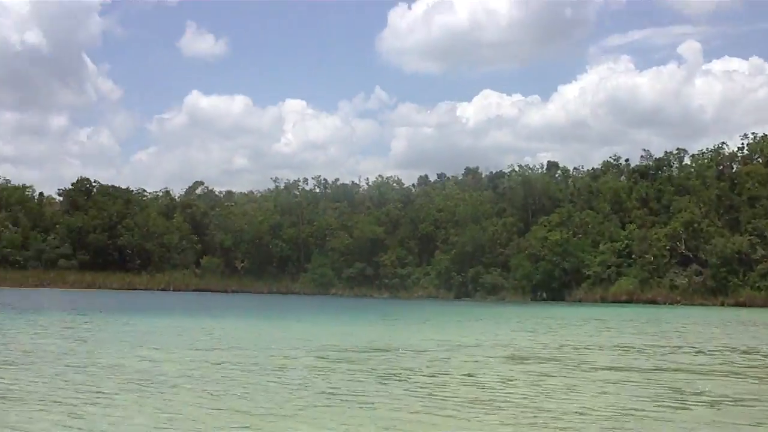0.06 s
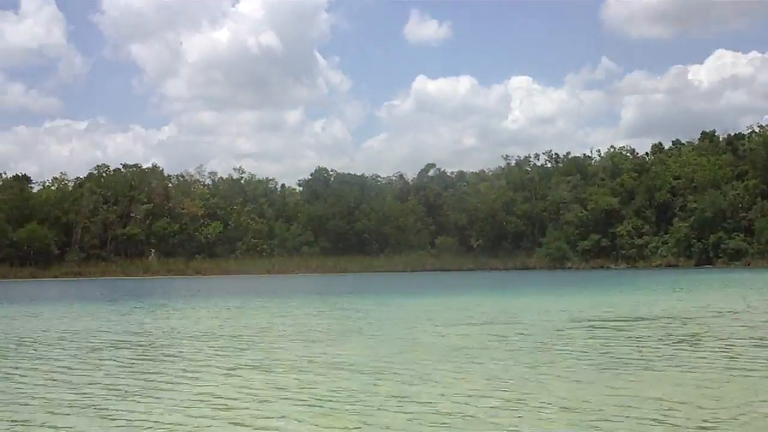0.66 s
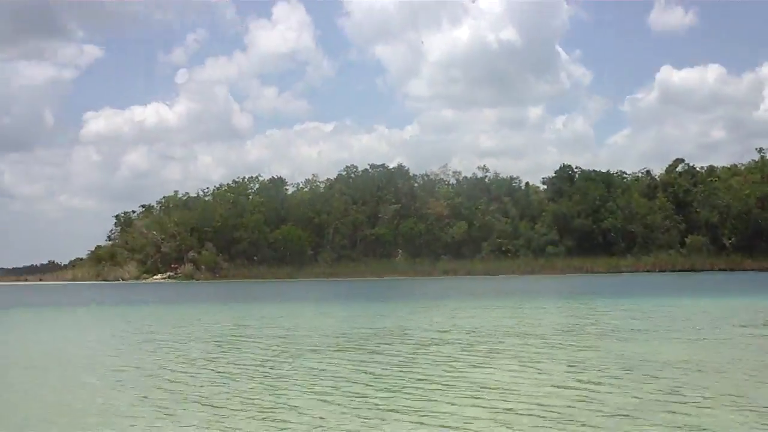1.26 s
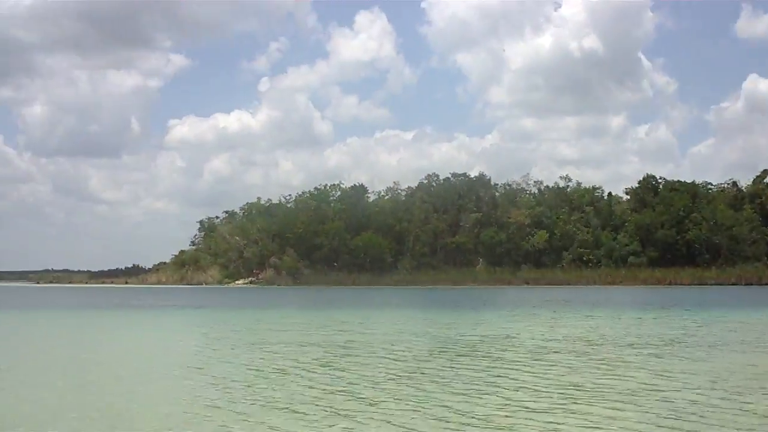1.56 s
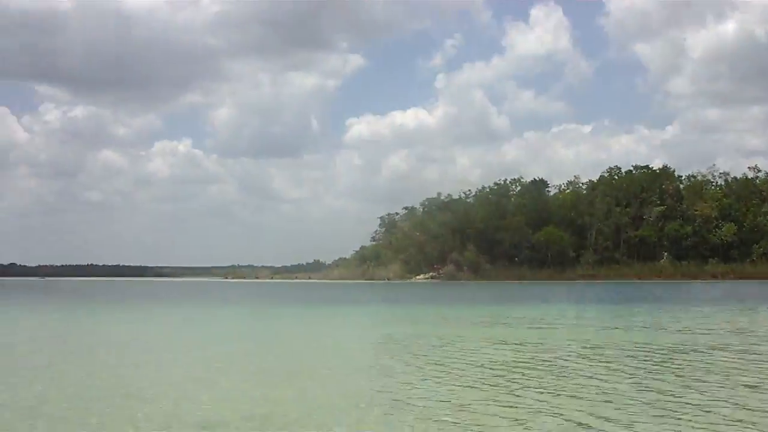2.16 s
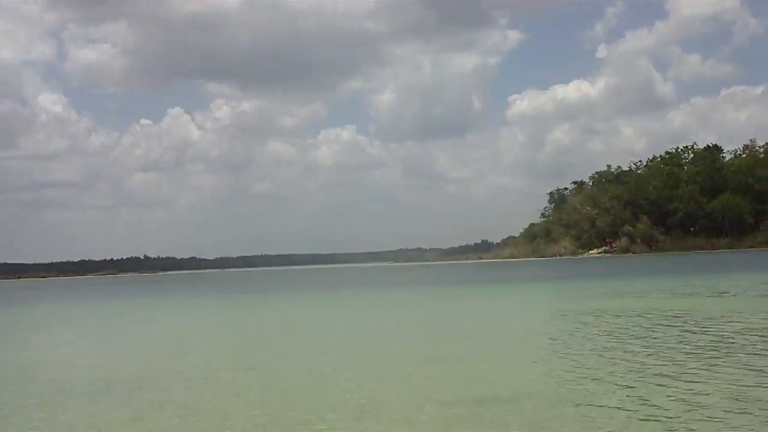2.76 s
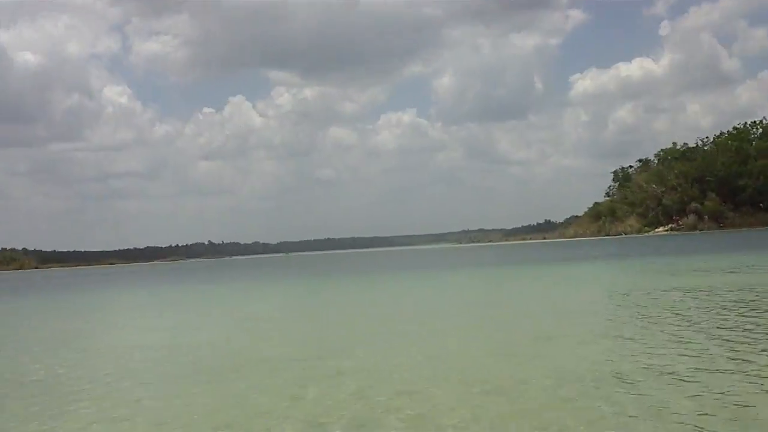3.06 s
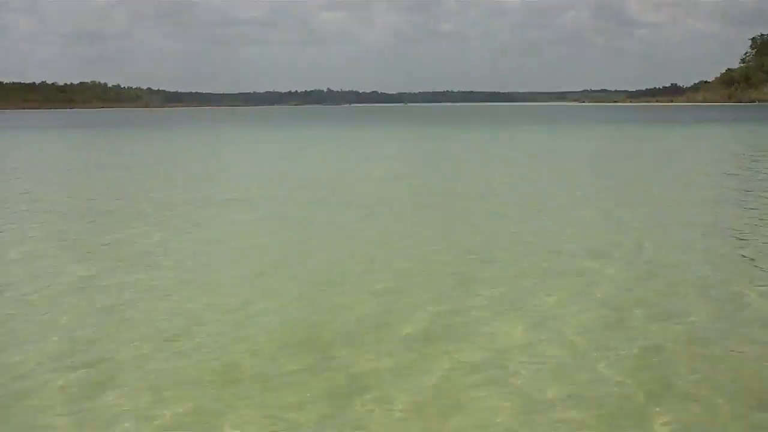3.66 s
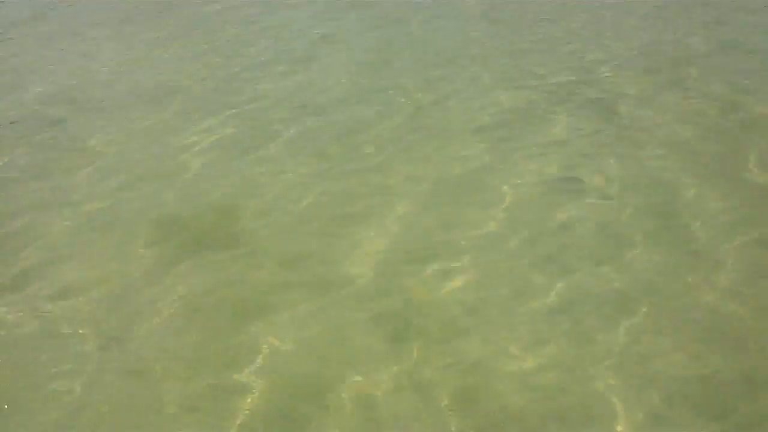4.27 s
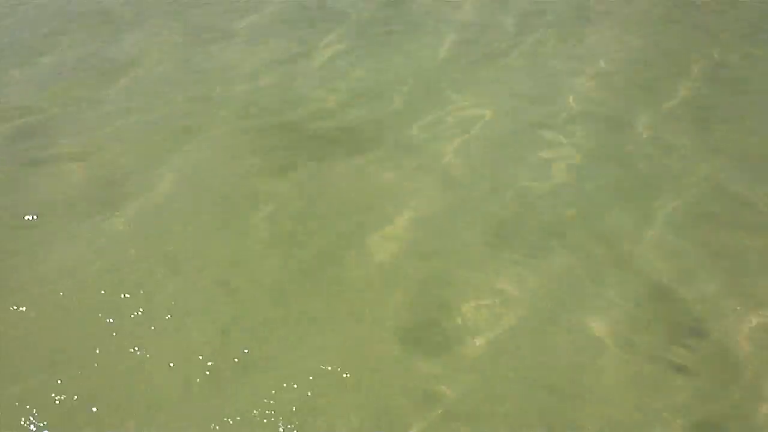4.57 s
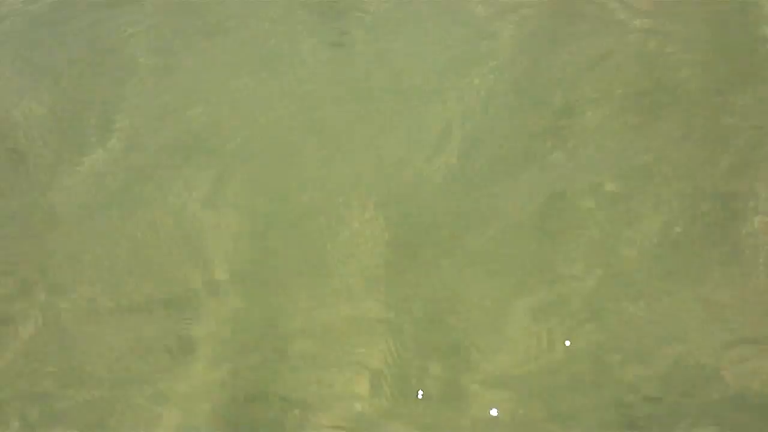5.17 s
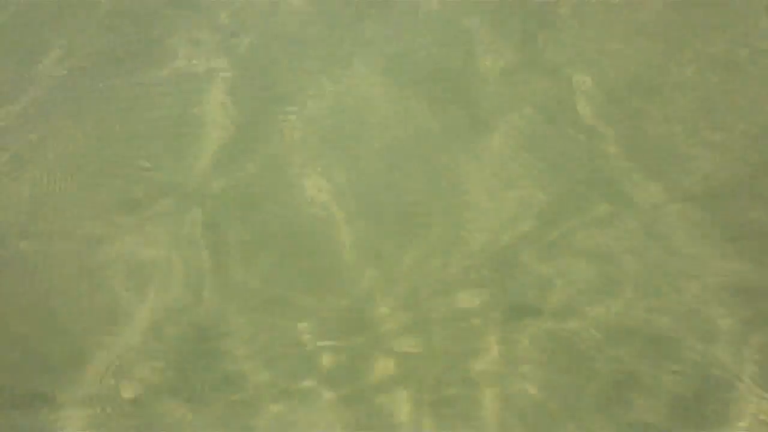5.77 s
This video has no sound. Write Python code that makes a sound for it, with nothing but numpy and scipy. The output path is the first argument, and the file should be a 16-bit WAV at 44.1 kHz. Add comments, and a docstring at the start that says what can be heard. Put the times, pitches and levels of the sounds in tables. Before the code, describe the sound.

Lake water laps, gurgles and slaps against a small boat, with a few sharp knocks and wind buffeting the microphone.

```python
"""Lake water around a small boat

Out on a lake in a little paddled boat, microphone close to the water. Each small wave builds, breaks
and drains, folding under air that rings as bubbles; some slap the hull or boom in the hollow below it.
Drops tick, foam fizzes and a few sharp knocks sound close by. Wind buffets the microphone over a
faint open-air hiss."""
import sys
import numpy as np
from scipy import signal
from scipy.fft import rfft, irfft, next_fast_len
from scipy.io import wavfile
from scipy.ndimage import uniform_filter1d

SR = 44100
rng = np.random.default_rng(int(sys.argv[2]) if len(sys.argv) > 2 else 0)


def persist_wave(psi):
    """Save psi, clipped to +-1, as 16-bit WAV."""
    counts = np.round(np.clip(psi, -1, 1) * 32767).astype(np.int16)
    wavfile.write(sys.argv[1], SR, np.atleast_2d(counts).T)


N = 261513
TIME = np.arange(N) / SR
# The ripple that never stops between waves.
RIPPLE_LAP_DB, RIPPLE_GURGLE_DB, RIPPLE_TRICKLE_DB, RIPPLE_SPRAY_DB = -45.5, -48, -58.5, -59


def gain_of(db):
    """Decibels to amplitude."""
    return 10 ** (np.asarray(db) / 20)


def unit_rms(x):
    """Scales x to rms 1."""
    return x / np.sqrt(np.mean(x ** 2) + 1e-20)


def decay(t, t60):
    """An exponential fade, 60 dB down at t60."""
    return np.exp(-np.log(1000) * t / t60)


def coloured(x, colour):
    """Filters x and scales it to rms 1. Each row of colour: frequency in Hz, relative gain in dB."""
    hz, db = np.transpose(colour)
    size = 2 * next_fast_len(N)
    bins = np.fft.rfftfreq(size, 1 / SR)
    shape = gain_of(np.interp(np.log(bins + 1), np.log(hz), db))
    return unit_rms(irfft(rfft(x, size) * shape)[:N])


def wander(per_s):
    """A drift of rms 1 through per_s random values a second."""
    knots = rng.standard_normal(2048)
    return unit_rms(np.interp(TIME * per_s, np.arange(len(knots)), knots))


def add(mix, start_s, sound):
    """Mixes a sound in at start_s."""
    part = mix[max(round(start_s * SR), 0):][:len(sound)]
    part += sound[:len(part)]


def bubble(hz, t60, rise, onset_cycles=0.92):
    """A pocket of air rings and dies; a positive rise lifts its pitch as it nears the surface."""
    t = np.arange(int(1.2 * t60 * SR) + 8) / SR
    fade = np.exp(-np.log(1000) * (t / t60) ** 0.99)
    swell = fade * (1 - np.exp(-t * hz / onset_cycles))
    return swell / swell.max() * np.sin(2 * np.pi * hz * t * (1 + rise * t / t60))


def swarm(level, low_hz, high_hz, per_s, cycles, spread_db, rise, pitches=90):
    """A crowd of bubbles of many sizes, evened in loudness; they come thicker where level is high."""
    out = np.zeros(N + SR)
    per_pitch = int(np.clip(per_s * N / SR / pitches, 1, 300))
    births = np.cumsum((level + 1e-9) ** .25)  # the birth rate follows the fourth root of level
    for hz in np.geomspace(low_hz, high_hz, pitches):
        life, climb = rng.random(2)
        when, size = rng.random((2, 300))[:, :per_pitch]
        t60 = min(cycles * 2 ** (2 * life - 1) / hz, .5)
        ring = bubble(hz, t60, 2 * rise * climb)
        strengths = gain_of(spread_db * np.minimum(-np.log(1 - size), 3))
        starts = np.searchsorted(births, when * births[-1])
        for at, strength in zip(starts, strengths):
            out[at:at + len(ring)] += strength * ring
    power = uniform_filter1d(uniform_filter1d(out[:N] ** 2, size=2000), size=2000)
    return out[:N] / np.sqrt(abs(power) + power.mean() / 20)


def splash(hz, t60, spread, rise_s=.0008):
    """A burst of breaking water: noise from hz / spread to hz * spread, peaking near 1."""
    t = np.arange(next_fast_len(int(1.2 * t60 * SR) + 400)) / SR
    band = signal.butter(3, [hz / spread, min(hz * spread, SR / 3)], "band", fs=SR, output="sos")
    noise = signal.sosfilt(band, rng.standard_normal(2 * len(t)))
    analytic = signal.hilbert(noise)[len(t):]
    even_rush = analytic.real / np.sqrt(uniform_filter1d(abs(analytic) ** 2, size=300))
    swell = decay(t, t60) * (1 - np.exp(-t / rise_s)) ** 2
    return even_rush * swell / swell.max()


def air(air_db=-44, sway_db=1):
    """The steady wash of breeze and ripples far across the lake."""
    air_colour = [(30, 4.5), (150, 1.5), (400, 0), (700, -15), (1000, -5), (1300, -5), (2000, -12.5),
                  (3200, -15.5), (5000, -21.5), (6200, -28.5), (7200, -39.5)]  # The wash's spectrum. Each row: frequency in Hz, gain in dB.
    return gain_of(air_db + sway_db * wander(5.6)) * coloured(rng.standard_normal(N), air_colour)


def wind(boost_db=3.0, lumpy_db=0.5):
    """Eddies buffet the microphone in uneven lumps."""
    gusts = [(0.0, -53), (0.14, -39), (0.26, -45), (0.32, -37.5), (0.41, -38), (0.47, -43), (0.62, -40),
             (0.67, -61), (0.76, -38.5), (1.11, -41), (1.34, -53), (1.41, -45), (1.59, -33), (1.67, -61),
             (1.73, -38.5), (1.9, -58), (2.16, -39), (2.24, -58), (2.6, -59), (2.73, -38.5), (3.05, -40),
             (3.2, -29), (3.37, -48), (3.9, -40), (4.04, -31), (4.22, -29.5), (4.3, -36.5), (4.75, -38),
             (5.12, -36), (5.52, -30), (5.7, -33), (5.76, -24.5), (5.89, -28.5)]  # Wind pressure at the microphone. Each row: time in seconds, level in dB.
    wind_colour = [(6, -1), (22, 2.5), (45, -4), (80, -6), (130, -14), (220, -32.5), (500, -35),
                   (1500, -68)]  # The rumble's spectrum. Each row: frequency in Hz, gain in dB.
    rumble = coloured(rng.standard_normal(N), wind_colour)
    eddies = unit_rms(rumble * gain_of(lumpy_db * wander(22)))
    gust_db = np.interp(TIME, *np.transpose(gusts))
    return gain_of(gust_db + boost_db) * eddies


def surge(foot_db=-19.5):
    """Each wave builds and drains into the ripple; gives the lap, gurgle, trickle and spray gains."""
    # Waves reaching the boat. Each row: crest time in seconds, lapping level in dB, build and drain in
    # seconds (between crest and foot_db), then gurgle, trickle and spray in dB relative to the lapping.
    waves = [(0.04, -39, 0.27, 0.41, 0, -10, -18.5), (0.391, -39.5, 0.031, 0.16, 9.5, -13, -23),
             (0.58, -40.5, 0.14, 0.15, -1.5, -2, -8), (0.89, -39, 0.17, 0.12, 11, -6.5, -10.5),
             (1.109, -31.5, 0.25, 0.12, 0.5, -10.5, -22), (1.29, -34, 0.56, 0.2, 0, -11, -23.5),
             (1.42, -32, 0.038, 0.22, -2, -7, -15), (1.527, -29, 0.12, 0.3, -4.5, -14, -22),
             (2.09, -40.5, 0.69, 0.21, 0.5, -8.5, -27.5), (2.468, -35.5, 0.053, 0.12, -7, -15, -36),
             (3.128, -29, 0.013, 0.15, 6, -5, -14), (3.3, -46.5, 0.18, 0.1, -9, 10, -3.5),
             (3.599, -28, 0.44, 0.38, -5, -5, -21), (3.734, -21.5, 0.069, 0.12, -7.5, -14, -50),
             (3.93, -23, 0.069, 0.12, -12, -11.5, -18.5), (4.789, -40, 0.2, 0.051, -5, -2.5, -6.5),
             (5.007, -33, 0.016, 0.27, 5.5, -6, -11), (5.1, -30, 0.3, 0.077, -6, -3.5, -10.5),
             (5.259, -28.5, 0.21, 0.25, -9.5, -8, -12.5), (5.389, -26.5, 0.39, 0.68, -5, -13, -21.5),
             (5.782, -32.5, 0.22, 0.18, 5, -0.5, -10)]
    power = gain_of([[RIPPLE_LAP_DB], [RIPPLE_GURGLE_DB], [RIPPLE_TRICKLE_DB], [RIPPLE_SPRAY_DB]]) ** 2
    for crest, db, build, drain, gurgle_db, trickle_db, spray_db in waves:
        from_crest = np.maximum((crest - TIME) / build, (TIME - crest) / drain)
        swell = gain_of(db + foot_db * np.minimum(from_crest, 10))
        power = power + (gain_of([[0], [gurgle_db], [trickle_db], [spray_db]]) * swell) ** 2
    return np.sqrt(power)


def churn(lapping, gurgling, trickling, gurgle_db=-1):
    """Waves fold air under: large pockets gurgle, smaller ones lap, those near the surface trickle."""
    # The spectra of the three bubble crowds. Each row: frequency in Hz, gain in dB.
    gurgle_colour = [(90, -15), (150, -3.5), (240, 2.5), (330, 3.5), (400, 3), (540, 4.5), (700, -19),
                     (1200, -53.5)]
    lap_colour = [(300, -2.5), (480, -6.5), (650, -1.5), (850, 1), (1000, 2.5), (1200, -4.5), (1500, -15.5)]
    trickle_colour = [(1000, -10), (1300, -1), (1800, 1), (2150, -17.5), (3000, -19.5), (5000, -46)]
    gurgle = swarm(gurgling, 119.9, 601, per_s=300, cycles=18.7, spread_db=4.0, rise=0.088)
    lap = swarm(lapping, 451.2, 1246, per_s=480, cycles=34, spread_db=3.5, rise=0.22)
    trickle = swarm(trickling, 1150, 2200, per_s=520, cycles=31, spread_db=4.0, rise=0.15, pitches=50)
    return (gain_of(gurgle_db) * gurgling * coloured(gurgle, gurgle_colour)
            + lapping * coloured(lap, lap_colour)
            + trickling * coloured(trickle, trickle_colour))


def spray(spraying, patter_db=-0.5, calm_fizz_db=-59.0):
    """Droplets patter on the broken surface, and the smallest bubbles burst in a fine wet crackle."""
    # The spectra of the droplets and the fizz. Each row: frequency in Hz, gain in dB.
    patter_colour = [(1300, -12), (1900, 4), (2500, 5), (3100, 2.5), (3800, -30), (6000, -38)]
    fizz_colour = [(2500, -2.5), (3400, -3), (4800, -2.5), (5800, -7), (6700, -22)]
    patter = swarm(spraying, 1700, 3700, per_s=600, cycles=24, spread_db=2.0, rise=0.17)
    fizz = swarm(spraying, 2800, 6900, per_s=1100, cycles=22, spread_db=3.5, rise=0.046)
    fizzing = (spraying / gain_of(RIPPLE_SPRAY_DB)) ** 0.56  # 0.56 dB of fizz for each dB of spray
    return (gain_of(patter_db) * spraying * coloured(patter, patter_colour)
            + gain_of(calm_fizz_db) * fizzing * coloured(fizz, fizz_colour))


def hull_echo(water, echo_db=-11, t60=0.12, taps_per_s=2000):
    """The direct sound, plus a brief scatter of reflections off the boat and the lake's surface."""
    t = np.arange(SR // 6) / SR
    taps = rng.standard_normal(len(t)) * (rng.random(len(t)) < taps_per_s / SR)
    taps *= (t > .002) * decay(t, t60)
    return water + gain_of(echo_db) * signal.oaconvolve(water, taps / np.linalg.norm(taps))[:N]


def plops(ring_db=-1.0, snap_db=-22, rise=0.09):
    """Single bubbles near the microphone; each pinches off with a wet snap and climbs in pitch."""
    # The loudest bubbles. Each row: start in seconds, pitch in Hz, level in dB, cycles to fade 60 dB.
    bubbles = [(0.06, 1030, -25.5, 28), (0.172, 1340, -26.5, 27), (0.229, 1185, -26.5, 24),
               (0.361, 236, -27, 7.5), (0.429, 335, -27, 18), (0.667, 1847, -21.5, 17),
               (0.729, 1348, -24, 27), (0.861, 180, -25.5, 20), (0.91, 140, -26, 13), (1.021, 865, -19, 27),
               (1.1, 209.6, -20, 18), (1.125, 477, -19.5, 17), (1.243, 907, -22.5, 22),
               (1.296, 577, -23, 28), (1.363, 543.6, -25, 18), (1.406, 625.5, -19, 18),
               (1.431, 810, -21.5, 17), (1.453, 524, -19.5, 20), (1.518, 167.7, -26.5, 12),
               (1.525, 400.3, -16, 5), (1.607, 810, -15.5, 7.5), (2.082, 908, -18, 30),
               (2.333, 919, -24, 11), (2.871, 623, -19, 13.5), (3.149, 1782, -20, 35),
               (3.161, 243, -13, 23), (3.2, 161, -23, 7), (3.163, 1680, -33.5, 34),
               (3.167, 2530, -31, 37.5), (3.211, 1270, -17, 30), (3.215, 900, -11.5, 14.5),
               (3.407, 941, -14.5, 12), (3.595, 1390, -21, 26), (3.598, 384.7, -20.5, 14),
               (3.659, 826.3, -17.5, 30.5), (3.66, 410, -20, 18), (3.819, 659.3, -17, 20),
               (3.917, 1420, -15, 25), (3.935, 673, -11.5, 29), (3.984, 376, -22, 5.5),
               (4.087, 1442, -22.5, 47.5), (4.163, 984, -20.5, 60.5), (4.226, 1300, -23, 22),
               (4.238, 200, -25, 9.5), (4.243, 1400, -27, 44), (4.312, 1164, -23, 24.5),
               (4.388, 949, -26, 15), (4.733, 914, -11.5, 15), (4.746, 418, -22, 11),
               (4.773, 1110, -17.5, 17.5), (4.887, 929.7, -24, 20), (4.949, 1662, -13, 43),
               (4.963, 1140, -11.5, 17.5), (5.002, 1285, -4.5, 28), (5.04, 1125, -11.5, 24),
               (5.068, 1340, -15, 26), (5.093, 1072, -9, 10.5), (5.183, 1040, -13, 26),
               (5.209, 956, -15, 18), (5.255, 309.4, -13, 9.5), (5.333, 1150, -15, 36),
               (5.384, 398, -12, 19.5), (5.404, 466.3, -15.5, 13.5), (5.495, 440, -14.5, 18),
               (5.532, 452, -21.5, 14.5), (5.615, 259, -17.5, 1.5), (5.639, 903.4, -17, 17.5),
               (5.642, 640, -18, 30), (5.662, 1928, -21.5, 52), (5.792, 935, -14.5, 20.5),
               (5.852, 887, -19, 26)]
    out = np.zeros(N)
    for (start, hz, db, cycles), climb in zip(bubbles, rng.random(len(bubbles))):
        add(out, start, gain_of(db + ring_db) * bubble(hz, cycles / hz, rise * climb))
        add(out, start, gain_of(db + snap_db) * splash(2 * hz, t60=0.0039, spread=1.3))
    return out


def drops(ring_db=-7, spatter_db=-6):
    """A falling drop traps one tiny bubble and scatters into a soft spatter."""
    # Drops landing close by. Each row: start in seconds, level in dB, pitch in Hz.
    landings = [(0.357, -39, 4700), (0.672, -30, 4403), (0.851, -34, 2520), (1.046, -33, 2777),
                (1.08, -35.5, 3266), (1.406, -35, 4380), (2.157, -26.5, 2040), (3.083, -32, 5900),
                (3.178, -19.5, 2340), (3.544, -34, 3040), (3.713, -28, 4000), (3.95, -23, 3870),
                (4.135, -27.5, 2260), (4.429, -27.5, 5064), (4.622, -26, 4300), (4.635, -26.5, 4830),
                (4.819, -35, 3795), (4.913, -22.5, 2680), (4.971, -29, 3650), (5.009, -26, 2833),
                (5.076, -31, 3020), (5.115, -21.5, 2500), (5.377, -22.5, 2060), (5.556, -27, 2150),
                (5.88, -27.5, 2216)]
    out = np.zeros(N)
    for start, db, hz in landings:
        add(out, start, gain_of(db + ring_db) * bubble(hz, t60=0.0092, rise=0.15, onset_cycles=0.8))
        add(out, start, gain_of(db + spatter_db) * splash(hz, t60=0.02, spread=1.157))
    return out


def slaps(smack_db=-20, clap_db=-2.0, break_db=-5, clap_cycles=5.2, clap_s=.0008, break_s=0.00249):
    """A wave closes on the hull: a thin bright smack, a clap of squeezed air, then the water breaks. The
    higher-pitched rows are lighter splashes and drop ticks, played the same way."""
    # Water hitting the hull, plus a few higher, lighter splashes and drop ticks (the rows above about 1500 Hz).
    # Each row: start in seconds, level in dB, pitch in Hz, splash t60 in seconds.
    hits = [(0.386, -18.5, 400, 0.029), (0.504, -30, 2103, 0.06), (1.044, -21, 1050, 0.05),
            (1.5067, -13.5, 1254, 0.022), (1.5166, -14, 1030, 0.02), (1.564, -11.5, 847, 0.009),
            (1.671, -20.5, 1386, 0.098), (2.068, -30.5, 2483, 0.035), (2.299, -28, 1960, 0.022),
            (2.845, -24.5, 1456, 0.15), (3.1202, -2.5, 723, 0.022), (3.1408, -12, 1940, 0.008),
            (3.179, -5.5, 787, 0.02), (3.391, -17.5, 1050, 0.027), (3.514, -17, 950, 0.055),
            (3.6427, -9.5, 879, 0.014), (3.687, -16, 840, 0.02), (3.7195, -12.5, 1110, 0.036),
            (3.863, -16.5, 980, 0.064), (3.928, -9, 666.7, 0.04), (4.819, -23, 1901, 0.07),
            (4.999, -4, 1132, 0.016), (5.0968, -6.5, 1160, 0.0072), (5.181, -16, 1310, 0.018),
            (5.254, -18, 875, 0.038), (5.384, -10, 812, 0.09), (5.741, -12, 909.6, 0.065)]
    out = np.zeros(N)
    for start, db, hz, t60 in hits:
        add(out, start, gain_of(db + smack_db) * splash(hz=2500, t60=0.0042, spread=1.67))
        add(out, start + clap_s, gain_of(db + clap_db) * bubble(hz, clap_cycles / hz, rise=0))
        add(out, start + break_s, gain_of(db + break_db) * splash(hz, t60, spread=1.376))
    return out


def foam(tilt_db=-4):
    """Where a crest has broken, a patch of tiny bubbles bursts in a crisp crackle."""
    # Patches of foam. Each row: loudest moment in seconds, level in dB, half length in seconds.
    patches = [(1.438, -53, 0.033), (4.823, -50, 0.012), (4.966, -53.5, 0.018), (5.04, -49, 0.026),
               (5.242, -52.5, 0.029), (5.787, -49.5, 0.11)]
    level = sum(gain_of(db) * np.exp(-((TIME - middle) / half) ** 2) for middle, db, half in patches)
    crackle = swarm(np.ones(N), 3400, 6600, per_s=810, cycles=33, spread_db=1.5, rise=0.027)
    return level * coloured(crackle, [(4800, 0.0033), (6600, tilt_db)])


def knocks(thump_t60=0.095, chatter_db=-15):
    """A hard, quickly damped crack that chatters for an instant, with a slow push of pressure below."""
    # Knocks close to the microphone. Each row: start in seconds, crack level in dB, thump level in dB.
    strikes = [(3.0807, -20.5, -16), (4.0997, -5.5, -16.5), (4.429, -31, -23.5), (4.998, -27, -11.5)]
    # What a knock rings with. Each row: frequency in Hz, relative level in dB, t60 in seconds.
    modes = [(367.6, -19.5, 0.18), (940, -4, 0.013), (1467, -7.5, 0.021), (1910, -9, 0.019),
             (2710, -17, 0.01), (3630, -18, 0.0081), (5400, -19, 0.002)]
    out, t = np.zeros(N), np.arange(SR // 6) / SR
    crack = sum((-1) ** k * gain_of(db) * decay(t, t60) * np.sin(2 * np.pi * hz * t)
                for k, (hz, db, t60) in enumerate(modes))
    crack /= abs(crack).max()
    thump = (1 - np.exp(-t / .001)) ** 2 * decay(t, thump_t60)
    for start, crack_db, thump_db in strikes:
        add(out, start, gain_of(crack_db) * crack + gain_of(thump_db) * thump)
        add(out, start, gain_of(crack_db + chatter_db) * splash(hz=3240, t60=0.01, spread=1.63))
    return out


def gulps(sag=0.16, onset_cycles=0.61):
    """A wave seals air under the hull; the hollow booms and sinks in pitch as the boat lifts."""
    # Booms under the hull. Each row: start in seconds, level in dB, t60 in seconds.
    booms = [(3.1214, -9.5, 0.13), (3.721, -13.5, 0.2)]
    # The hollow's resonances. Each row: frequency in Hz, relative level in dB, share of the boom's t60.
    modes = [(115.34, -10, 1.0), (161, -12.5, 0.82), (268.2, -1.5, 0.96), (507.9, -4, 0.35),
             (849.8, -5, 0.4), (1440, -9.5, 0.2)]
    out = np.zeros(N)
    for start, db, t60 in booms:
        for hz, mode_db, share in modes:
            add(out, start, gain_of(db + mode_db) * bubble(hz, share * t60, -sag * share, onset_cycles))
    return out


def glugs(waver=0.0612, flutter_db=3.5):
    """Water closes over a pocket of air, whose note slides and wavers as it changes size."""
    # Air pockets. Each row: start and length in seconds, first and last pitch in Hz, level in dB.
    pockets = [(3.184, 0.012, 773, 950, -18), (3.742, 0.025, 219, 260, -15.5),
               (4.788, 0.011, 1090, 1703, -25.5), (5.04, 0.42, 380, 420, -28),
               (5.216, 0.046, 390, 280.3, -25), (5.265, 0.049, 368, 623, -22.5),
               (5.41, 0.043, 430, 558.2, -27), (5.682, 0.023, 600, 643, -24.5), (5.9, 0.03, 508, 952, -22)]
    out = np.zeros(N)
    for start, length, first_hz, last_hz, db in pockets:
        n = int(length * SR)
        hz = np.geomspace(first_hz, last_hz, n) * (1 + waver * wander(155.8)[:n])
        swell = signal.windows.tukey(n, .5) * gain_of(db + flutter_db * wander(130)[:n])
        add(out, start, swell * np.sin(2 * np.pi * np.cumsum(hz) / SR))
    return out


def scene():
    """Water around the boat in wind and open air, in mono; the nearest drops and knocks stay dry."""
    lapping, gurgling, trickling, spraying = surge()
    water = churn(lapping, gurgling, trickling) + spray(spraying) + foam()
    water = water + plops() + glugs() + gulps() + slaps()
    return (hull_echo(water) + drops() + knocks() + wind() + air())[None]


def record(dry):
    """The hardest peaks are gently rounded off, and a small recorder in the boat cuts the high treble."""
    ceiling, edge_hz = .93, 7250
    rounded = dry / (1 + (dry / ceiling) ** 10) ** (1 / 10)
    lowpass = signal.firwin(301, edge_hz, window=("kaiser", 8), fs=SR)
    return signal.oaconvolve(rounded, lowpass[None], "same")


dry = scene()
out = record(dry)
persist_wave(out)
```